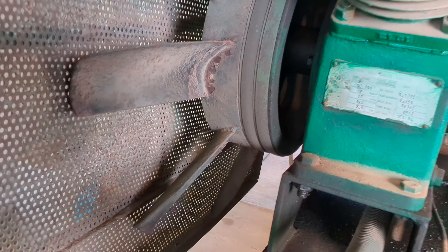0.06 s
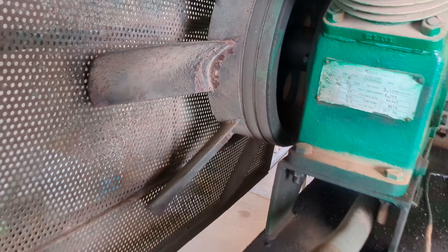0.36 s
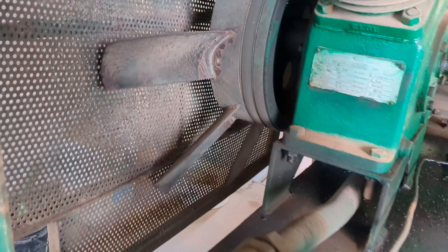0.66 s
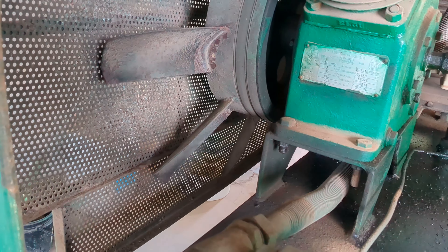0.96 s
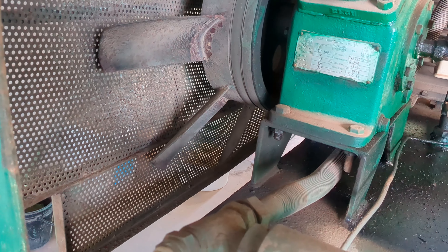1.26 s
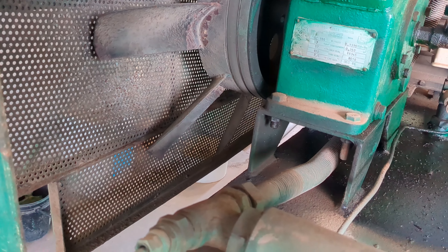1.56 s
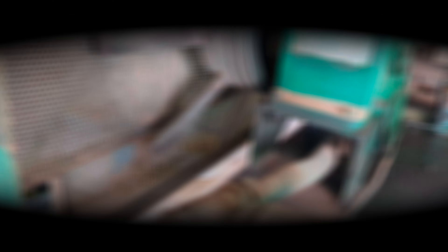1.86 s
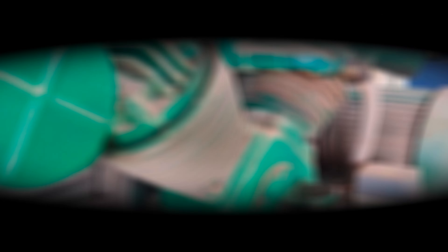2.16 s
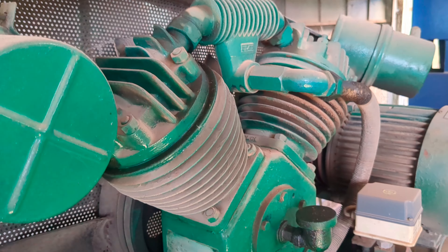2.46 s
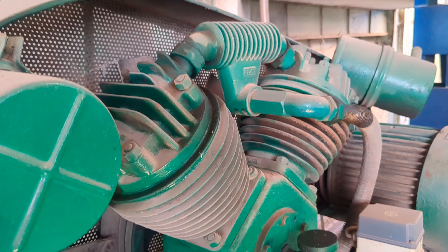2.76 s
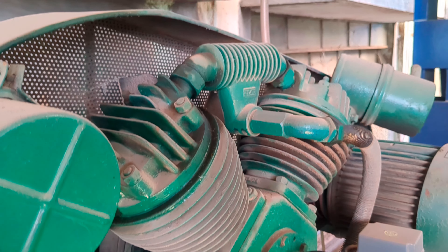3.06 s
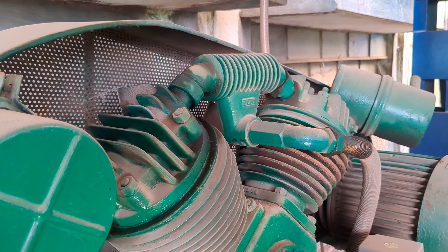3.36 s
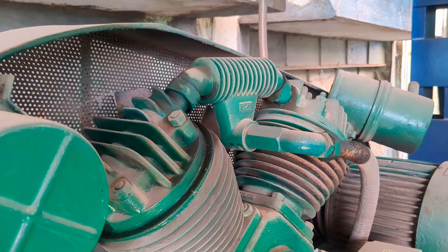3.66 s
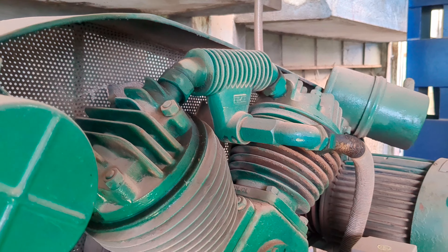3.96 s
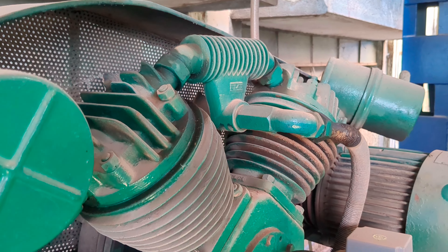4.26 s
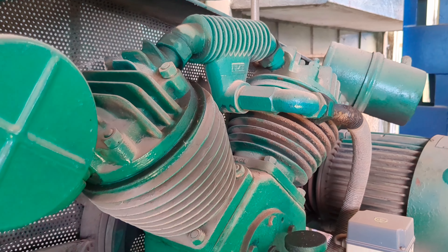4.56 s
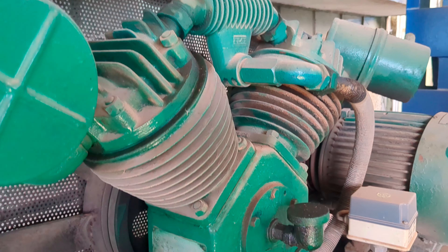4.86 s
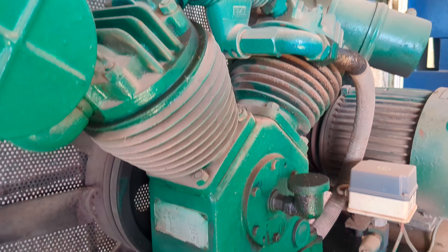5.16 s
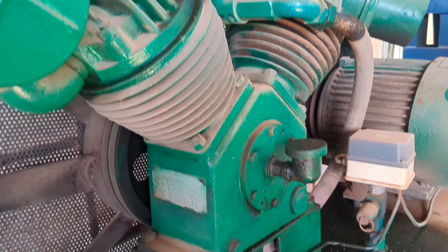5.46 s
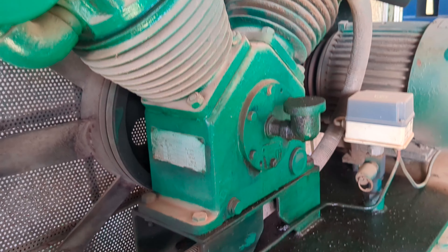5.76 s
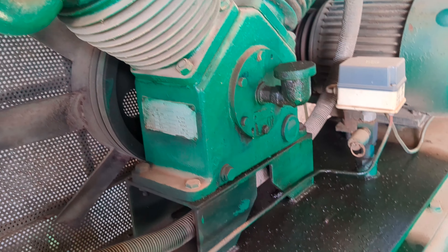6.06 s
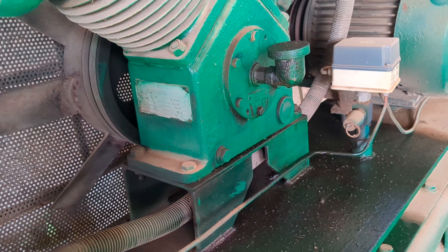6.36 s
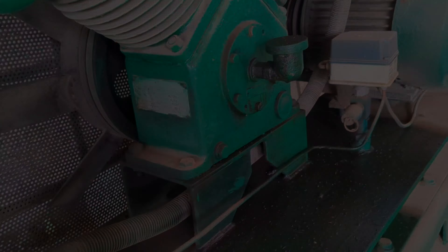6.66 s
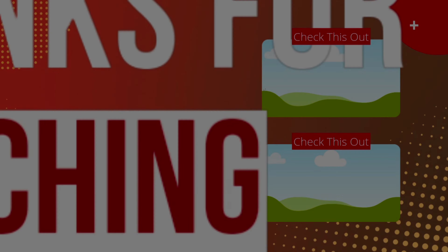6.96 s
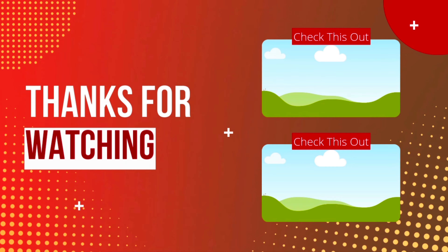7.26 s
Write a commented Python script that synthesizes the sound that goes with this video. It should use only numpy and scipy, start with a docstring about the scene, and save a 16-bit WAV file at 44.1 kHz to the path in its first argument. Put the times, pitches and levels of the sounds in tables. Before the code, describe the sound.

Close microphones in a shed pick up an air compressor: a fluttering hiss from valves and cooling air, the steady hum of its belt drive and a hollow intake rumble. The sound is first heard beside the pulley guard. A very short break leads to a position by the cylinders, where it starts lower with a more prominent hum, builds again and stops suddenly.

```python
"""A dense, fluttering rush of air over a hum and a rumble: a belt-driven piston compressor in a shed.
The stereo pair stands close to the pulley guard, then, after a short break, close to the cylinders,
where the sound starts low and swells back until it is cut off. The machine runs at constant speed.
Valves and cooling air make the rush, the drive hums and whines, gulps of intake air shake the hollow
parts, and the pistons keep frame and tank ringing."""
import sys
import numpy as np
from scipy import signal
from scipy.fft import rfft, irfft, next_fast_len
from scipy.io import wavfile

SR = 44100
rng = np.random.default_rng(int(sys.argv[2]) if len(sys.argv) > 2 else 0)


def dump(signal):
    """Clip the signal to [-1, 1] and save it as 16-bit WAV at the path in sys.argv[1]."""
    limited = np.clip(np.atleast_2d(signal).T, -1, 1)
    pcm = np.round(limited * 32767).astype(np.int16)
    wavfile.write(sys.argv[1], SR, pcm)


N = 322812
TIME = np.arange(N) / SR
PADDED = next_fast_len(N, real=True)
BINS_HZ = np.maximum(np.arange(PADDED // 2 + 1) * SR / PADDED, 1)

GUARD, CYLINDERS = 0, 1   # the two microphone places; pairs of settings come in this order
STRETCHES_S = ((0, 2.007), (2.057, 6.792))   # start and end at each place
SETTLED_DB = (-32.5, -32.0)


def from_db(db):
    """Decibels to gain."""
    return np.exp(np.asarray(db) * (np.log(10) / 20))


def unit_rms(x):
    """Scale to unit power."""
    return x / np.sqrt(np.mean(x ** 2) + 1e-20)


def in_time(rows):
    """A curve through rows of seconds and value, at every sample."""
    return np.interp(TIME, *np.transpose(rows))


def at_hz(points, hz, column=1):
    """Read one column of a spectrum on a log-frequency axis."""
    points = np.array(points)
    return np.interp(np.log(hz), np.log(points[:, 0]), points[:, column])


def swell(peak_s, length_s):
    """A bell curve that is down to about a third at length_s from its peak."""
    return np.exp(-np.minimum(((TIME - peak_s) / length_s) ** 2, 20))


def drift(rate):
    """Smooth chance that changes about rate times a second; spread 1."""
    pole = np.exp(-80 * np.pi * rate / SR)
    noise = rng.standard_normal(N // 40 + 2002)   # one value every 40 samples
    slow = signal.lfilter([1], [1, -2 * pole, pole * pole], noise)[2000:]
    return np.interp(np.arange(N) / 40, np.arange(len(slow)), unit_rms(slow))


def machine_db(place, sag_db=7.5, recovery_s=1.9):
    """The machine's level: steady at the guard; at the cylinders it starts low and recovers slowly."""
    if place == GUARD:
        return SETTLED_DB[place]
    since = np.maximum(TIME - STRETCHES_S[CYLINDERS][0], 0)
    return SETTLED_DB[place] - sag_db * np.exp(-since / recovery_s)


def heard_during(start, end, fade_in_s=0.0042, tail_db=-34, tail_s=0.011):
    """Opens quickly and shuts at once, leaving a faint, very short tail."""
    tail = from_db(tail_db) * np.exp(-np.maximum(TIME - end, 0) / tail_s)
    return np.clip((TIME - start) / fade_in_s, 0, 1) * np.where(TIME < end, 1, tail)


# Stereo width at the microphone pair. Each row: frequency in Hz, side minus mid in dB.
PAIR_WIDTH = [(60, -13.5), (92, -31), (140, -22.5), (210, -14), (330, -14.5), (500, -7.5), (770, -5),
              (1170, 0.5), (1790, 3), (2740, -0.5), (4190, 0), (6410, 0.5), (9810, 0), (15000, 0.5)]
# Balance at the pair. Each row: frequency in Hz, left minus right in dB.
PAIR_BALANCE = [(60, 1.5), (92, -0.5), (140, 0), (210, 0), (330, 1), (500, -1), (770, 0), (1170, -2),
                (1790, -4), (2740, -5.5), (4190, 0), (6410, -0.5), (9810, -2.5), (15000, 2.5)]

def microphones(mid, side, hz):
    """Long waves reach both microphones alike, short ones differently."""
    width = from_db(at_hz(PAIR_WIDTH, hz))
    lean = from_db(at_hz(PAIR_BALANCE, hz) / 2)
    return np.array([(mid + width * side) * lean, (mid - width * side) / lean]) / np.hypot(1, width)


def standing_waves(spacing_hz=22.0):
    """Reflections in the shed raise and sink the spectrum every few tens of hertz; spread about 1."""
    grid = np.arange(0, SR / 2 + spacing_hz, spacing_hz)
    return np.interp(BINS_HZ, grid, rng.standard_normal(SR // 4)[:len(grid)])


def turbulence(spectrum, place, ripple_db, direct_db=(-8, -8.5), screen_hz=3500.0, right_lag_s=.00052):
    """Air noise at one place: the shed's echoes plus a direct wave from the left; rms 1."""
    low, high = spectrum[0][0], spectrum[-1][0]
    steep_edges = ((1 + (low / BINS_HZ) ** 20) * (1 + (BINS_HZ / high) ** 20)) ** -.5
    colour = from_db(at_hz(spectrum, BINS_HZ, column=1 + place)) * steep_edges
    mid, side, direct = (rfft(rng.standard_normal(PADDED)) * colour * from_db(ripple_db * standing_waves())
                         for _ in range(3))
    share = from_db(direct_db[place]) / np.sqrt(1 + BINS_HZ / screen_hz)   # the machine screens treble
    direct = share * np.array([direct, direct * np.exp(-2j * np.pi * BINS_HZ * right_lag_s)])
    both = (microphones(mid, side, BINS_HZ) + direct) / np.hypot(1, share)
    return unit_rms(irfft(both, PADDED)[:, :N])


def ringing(hz, width_hz):
    """A metal resonance kept sounding by dense chatter; rms about 1."""
    radius = np.exp(-np.pi * width_hz / SR)
    poles = [1, -2 * radius * np.cos(2 * np.pi * hz / SR), radius * radius]
    mid, side = unit_rms(signal.lfilter([1, 0, -1], poles, rng.standard_normal((2, N))))
    return microphones(mid, side, hz)


def shaft_tone(hz, shaft_time, waver_db):
    """A tone locked to the turning shaft, wavering in strength; rms about 1."""
    angle = 2 * np.pi * ((hz * shaft_time + rng.random()) % 1)
    strength = np.sqrt(2) * from_db(waver_db * drift(1.9))
    return strength * microphones(np.cos(angle), np.sin(angle), hz)


# Valve plates and fins, faint at both places. Each row: pitch in Hz, dB over the machine's level.
VALVE_MODES = [(2395, -18), (2490, -20.5), (2595, -17.5)]

def valve_ring(width_hz=17.0, waver_db=2.5):
    """Chattering plates keep a few metal resonances ringing."""
    return sum(ringing(hz, width_hz) * from_db(db + waver_db * drift(2.8)) for hz, db in VALVE_MODES)


# Flares of the valve ring, close by. Each row: peak time in seconds, pitch in Hz, bandwidth in Hz,
# level in dB, fall time in seconds.
VALVE_FLARES = [(0.16, 2400, 60, -36, .05), (1.93, 2620, 50, -44, .04), (5.809, 2410, 110, -35.5, 0.031),
                (5.897, 2530, 130, -37, .03), (6.03, 2440, 110, -39.5, .03), (6.654, 2485, 170, -33, .025)]

def valve_flares():
    """Now and then the plates chatter harder for a moment, with a rough metallic ring."""
    return sum(ringing(hz, width_hz) * from_db(db) * swell(peak_s, length_s)
               for peak_s, hz, width_hz, db, length_s in VALVE_FLARES)


# Frame and tank, alike at both places. Each row: pitch in Hz, dB over the machine's level.
FRAME_AND_TANK_MODES = [(117, -17), (142.5, -14.5), (182.5, -12.5), (194.5, -11.5), (203, -17.5),
                        (222, -12.5), (232.5, -14.5), (242.5, -10), (299, -21.5), (388, -16.5),
                        (490, -19.5), (530, -20.5)]

def frame_ring(width_hz=3.8):
    """The pistons' shaking keeps the low modes of frame and tank ringing; they beat together."""
    return sum(from_db(db) * ringing(hz, width_hz) for hz, db in FRAME_AND_TANK_MODES)


# Thumps near the microphones. Each row: peak time in seconds, pitch in Hz, level in dB.
HOLLOW_THUMPS = [(0.04, 494, -38), (0.06, 119.6, -35), (0.11, 471, -38), (0.26, 226, -36), (0.28, 483, -32),
                 (0.43, 471, -31), (0.46, 497, -33), (0.91, 180.6, -33), (0.92, 492, -36),
                 (0.97, 484, -34.5), (1.01, 288, -35), (1.15, 233.7, -38), (1.29, 200, -35),
                 (1.36, 200, -36), (1.55, 490, -40), (1.65, 500, -36.5), (2.59, 230.7, -38),
                 (2.76, 497, -40.5), (2.91, 487, -38.5), (3.05, 206, -40), (3.13, 200, -38),
                 (3.21, 194, -35), (3.28, 487, -37), (3.36, 489, -41), (3.43, 229.4, -29.5),
                 (3.44, 196, -34.5), (3.61, 193, -32), (3.86, 481, -36.5), (3.95, 189.6, -34.5),
                 (4.16, 527, -36.5), (4.56, 231, -36), (5.19, 391.8, -38.5), (5.85, 196, -36),
                 (5.96, 228, -31.5), (6.14, 401, -34.5), (6.23, 211.4, -35), (6.71, 196, -33)]

def hollow_thumps(rise_s=0.022, fall_s=0.028, wander=0.015):
    """Resonances build up out of the rumble and die away, a little unsteady in pitch."""
    out = np.zeros((2, N))
    unsteady_time = np.cumsum(1 + wander * drift(30)) / SR
    for (peak_s, hz, db), phase in zip(HOLLOW_THUMPS, rng.random(len(HOLLOW_THUMPS))):
        near = np.abs(TIME - peak_s) < .5
        since = TIME[near] - peak_s
        envelope = np.sqrt(2) * from_db(db) * np.exp(-(since / np.where(since < 0, rise_s, fall_s)) ** 2)
        angle = 2 * np.pi * (hz * unsteady_time[near] + phase)
        out[:, near] += envelope * microphones(np.cos(angle), np.sin(angle), hz)
    return out


# Surges of the intake pipe, close by. Each row: peak time in seconds, pitch in Hz, level in dB.
PIPE_SURGES = [(0.40, 347, -36), (0.46, 350, -39.5), (0.79, 339, -39.5), (1.00, 341, -36),
               (1.11, 338.6, -32), (1.26, 341, -33), (1.77, 342, -34.5), (1.89, 353, -37), (2.74, 343, -40),
               (3.11, 341, -36), (3.33, 341, -38), (3.69, 344, -35), (4.06, 344, -39.5), (4.23, 344, -34.5),
               (4.47, 346, -40), (4.57, 347, -38), (4.68, 343, -35), (4.85, 340.6, -32), (4.94, 335.3, -40),
               (5.04, 339, -39), (5.20, 347, -37.5), (5.30, 344, -32.5), (5.54, 343, -31.5),
               (6.00, 340, -40.5), (6.13, 349.3, -36.5), (6.51, 346, -36)]

def intake_pipe(place, note_db=-12.5, wander=0.0078, throb_db=3.0, extra_sag=0.41, surge_s=0.029):
    """The pipe sings one hollow note that throbs with the flow; each surge bends it to its own pitch."""
    times, pitches, _ = np.transpose(PIPE_SURGES)
    pitch = np.interp(TIME, times, pitches) * (1 + wander * drift(11.8))
    angle = 2 * np.pi * np.cumsum(pitch) / SR
    sag_db = SETTLED_DB[place] - machine_db(place)
    throb = np.tanh(drift(5.8))
    steady = from_db(machine_db(place) + note_db - extra_sag * sag_db + throb_db * throb)
    surges = sum(from_db(db) * swell(peak_s, surge_s) for peak_s, _, db in PIPE_SURGES)
    envelope = np.sqrt(2) * np.hypot(steady, surges)
    return envelope * microphones(np.cos(angle), np.sin(angle), pitches.mean())


# The drive's hum. Each row: harmonic number, dB over the settled level at the guard, at the cylinders.
HUM_HARMONICS = [(1, -14, -6), (6, -15, -18)]
# The main drone as the microphones move about. Each row: time in seconds, level in dB.
DRONE_CURVE = [(0.0, -35), (1.75, -34.5), (2.1, -36.5), (2.65, -41.5), (3.2, -36), (3.62, -41.5),
               (3.85, -36.5), (4.95, -37.5), (5.3, -35), (6.75, -35)]
# Motor, belts and bearings, and two steady high lines of the valve plates. Each row: pitch in Hz, dB over the
# machine's level at the guard, the same at the cylinders.
RUNNING_TONES = [(53.8, -7.8, -13), (112.6, -15, -12), (767.5, -20.5, -21.5), (2374, -17.5, -20),
                 (2611, -23.5, -25.5)]
# Thin motor whine, a comb of side bands. Each row: pitch in Hz, dB over the machine's level.
MOTOR_WHINE = [(11913, -31), (11974, -33), (12035, -34), (12096, -33.5)]
# The cooling fan's note, strongest in front of the guard. Each row: time in seconds, dB over the
# machine's level.
FAN_CURVE = [(0.0, -13.5), (0.5, -8.5), (1.0, -11.5), (1.6, -16.5), (2.6, -16), (3.9, -10), (4.4, -19.5),
             (6.8, -24)]

def belt_drive(place, hum_hz=80.84, speed_wobble=.00018, fan_rough_db=1.9, hum_spared=.3):
    """Hum, drone, tones, whine and fan note all follow the slight unsteadiness of the belt drive."""
    shaft_time = np.cumsum(1 + speed_wobble * drift(2.36)) / SR
    hum = sum(from_db(db[place]) * shaft_tone(harmonic * hum_hz, shaft_time, waver_db=0.0)
              for harmonic, *db in HUM_HARMONICS)
    hum *= from_db(hum_spared * (SETTLED_DB[place] - machine_db(place)))   # sags less than the air
    drone = shaft_tone(2 * hum_hz, shaft_time, waver_db=0.3) * from_db(in_time(DRONE_CURVE))
    tones = sum(from_db(db[place]) * shaft_tone(hz, shaft_time, waver_db=2.5)
                for hz, *db in RUNNING_TONES)
    whine = sum(from_db(db) * shaft_tone(hz, shaft_time, waver_db=-1.0) for hz, db in MOTOR_WHINE)
    fan = shaft_tone(10 * hum_hz, shaft_time, waver_db=1.5)
    fan *= from_db(in_time(FAN_CURVE) + fan_rough_db * drift(14))   # the blades chop uneven air
    return from_db(machine_db(place)) * (hum + tones + whine + fan) + drone


# Resonances of intake cans, tank and guard, from close by. Each row: frequency in Hz, relative
# density in dB at the guard, the same at the cylinders.
RUMBLE_SPECTRUM = [(14.9, -26.5, -18), (33, -21.5, -26.5), (46, -7.5, -12), (65, -7, -9.5), (75.4, -9, -10),
                   (84.6, -12.5, -15.5), (100, -9.5, -9), (128, -5, -5.5), (156, -8, -10),
                   (185.5, -2, -3.5), (237.8, -5.5, -7.2), (284, -9, -8.5), (309.5, -8.5, -9.5),
                   (398, -8, -7), (414, -10.5, -9), (512, -6, -7.5), (575, -17, -12)]

def intake_rumble(place, gain_db=(1.4, 1.34), buffet_db=0.8):
    """Gulps of intake air shake the hollow parts."""
    air = turbulence(RUMBLE_SPECTRUM, place, ripple_db=1.1)
    return air * from_db(gain_db[place] + buffet_db * drift(26))


# Air in valves and cooling fins, from close by. Each row: frequency in Hz, relative density in dB
# at the guard, the same at the cylinders.
RUSH_SPECTRUM = [(520, 0, -2.5), (684, -1, -0.5), (805, -1, 0.5), (1284, -1.5, -0.76), (2104, -2.5, -2),
                 (2270, -5, -2), (2480, -4, -2.1), (3400, -9.5, -7), (5620, -17.5, -17), (6750, -14, -14.5),
                 (8000, -21, -19.5), (8940, -17.5, -16.5), (12300, -20, -18.5), (13800, -29, -27.5),
                 (15630, -27, -26)]
# The low middle hollows out and fills as the microphones move. Each row: time in seconds, gain in dB.
LOW_MIDDLE_CURVE = [(0.0, 0.5), (1.9, 0), (2.15, -1.5), (2.6, 0), (2.9, -0.5), (3.3, -1.5), (4.1, 2),
                    (4.6, -1), (4.8, -2.5), (5.35, -1), (5.6, -1), (6.8, 2)]

def air_rush(place, gain_db=2.5, stroke_hz=7.35, stroke_db=-0.05, flutter_db=0.61, middle_hz=(625, 770)):
    """Valve chatter and fan air merge into a fluttering hiss that pulses faintly with the pistons."""
    strokes = np.cos(2 * np.pi * stroke_hz * TIME)
    level_db = gain_db + stroke_db * strokes + flutter_db * drift(15)
    air = turbulence(RUSH_SPECTRUM, place, ripple_db=1.37) * from_db(level_db)
    low_middle = signal.sosfiltfilt(signal.butter(2, middle_hz, "band", fs=SR, output="sos"), air)
    return air + low_middle * (from_db(in_time(LOW_MIDDLE_CURVE)) - 1)


def scene():
    """The same machine from close to the guard, then from close to the cylinders."""
    out = np.zeros((2, N))
    thumps = hollow_thumps()
    flares = valve_flares()
    metal = valve_ring() + frame_ring()
    for place in (GUARD, CYLINDERS):
        noise = from_db(machine_db(place)) * (air_rush(place) + intake_rumble(place) + metal)
        compressor = noise + intake_pipe(place) + belt_drive(place) + thumps + flares
        out += heard_during(*STRETCHES_S[place]) * compressor
    return out + 1e-18


def record(dry, cutoff_hz=15800):
    """The top of the treble is cut steeply."""
    return signal.sosfilt(signal.ellip(12, .1, 90, cutoff_hz, fs=SR, output="sos"), dry)


dry = scene()
out = record(dry)
dump(out)
```